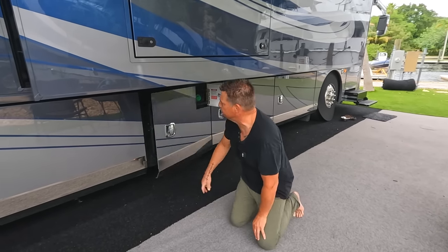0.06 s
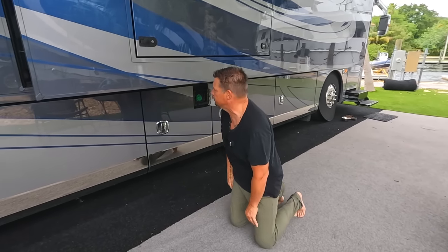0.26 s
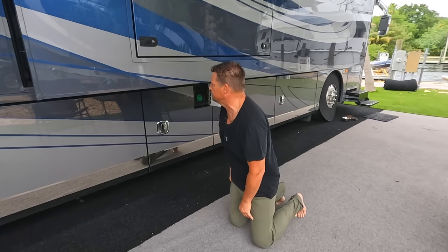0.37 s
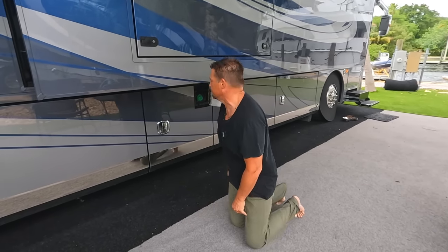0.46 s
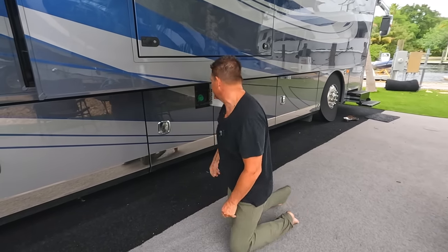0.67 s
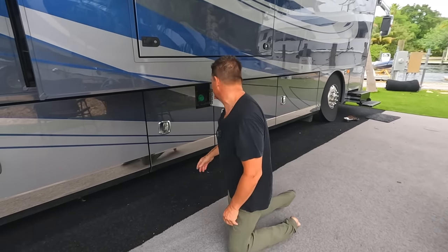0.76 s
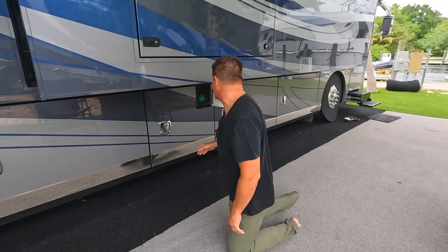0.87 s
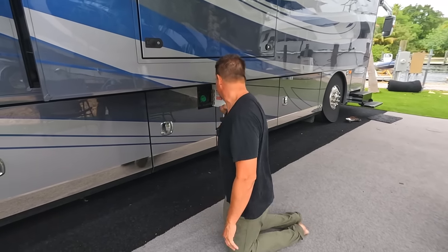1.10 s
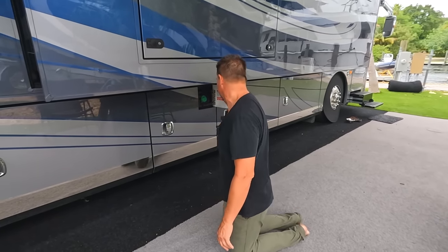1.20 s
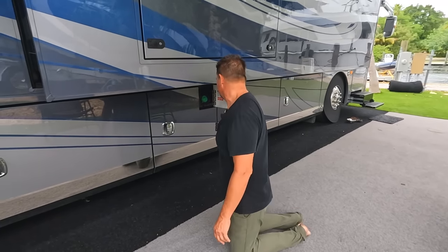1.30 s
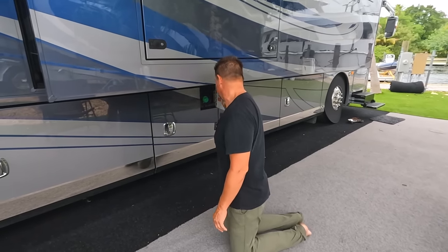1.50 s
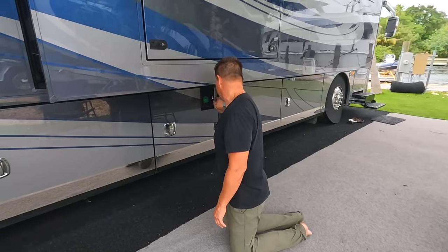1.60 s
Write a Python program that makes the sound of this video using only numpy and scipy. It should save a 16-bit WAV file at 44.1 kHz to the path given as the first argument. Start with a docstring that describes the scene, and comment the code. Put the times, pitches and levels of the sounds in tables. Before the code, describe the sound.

A metal storage door on a motorhome slams shut at about 0.25 seconds, just after a very faint hinge squeak. It booms hollowly, rattles and rings briefly as the steel latch snaps in. Deep, soft thumps follow around 0.5 seconds, with weaker ones between 1.0 and 1.4 seconds and a faint cloth scuff near 1.2. A quiet, distant outdoor rumble continues throughout.

```python
"""Outdoors, at a motorhome: the sheet-metal door of a storage bay is pushed shut.
The hinge squeaks faintly; the door meets the latch, slams home and rattles, its skin ringing.
The air shut in the bay booms and the steel latch snaps in with a small ring.
A few soft low thumps and a scuff of cloth follow, over a distant rumble."""
import sys
import numpy as np
from scipy import signal
from scipy.fft import rfft, irfft
from scipy.io import wavfile
from scipy.ndimage import uniform_filter1d

SR = 44100
rng = np.random.default_rng(int(sys.argv[2]) if len(sys.argv) > 2 else 0)


def wav_out(sig):
    """Save sig, one row per channel (or a flat mono array), as 16-bit PCM at SR to the path in sys.argv[1]."""
    wavfile.write(sys.argv[1], SR, np.round(np.clip(np.atleast_2d(sig).T, -1, 1) * 32767).astype(np.int16))


N = 72765
T = np.arange(N) / SR

# spectrum of pitch waver: (frequency [Hz], level [dB])
WAVER_SPECTRUM = [(20, 0), (200, -6)]


def door():
    """A run of contacts shakes panel and latch metal; the skin and the whole door ring on."""
    # door against frame and latch: (time [s], dull panel [dB], bright metal [dB])
    contacts = [(0.2395, -21, -29), (0.2424, -18, -27), (0.2494, -14, -28), (0.2514, -13.5, -17),
                (0.2556, -16.5, -21.5), (0.259, -37, -30), (0.2637, -21, -25), (0.2685, -35, -30),
                (0.2875, -22.5, -41), (0.2933, -25.5, -29), (0.301, -31, -38), (0.3498, -35, -40.5)]
    # contact spectra: (frequency [Hz], density [dB])
    panel_spectrum = [(150, -6), (220, -4), (330, -6.5), (450, 4), (570, -11), (680, -7.5), (900, -12),
                      (1350, -11), (1900, -20), (3000, -24.5)]
    metal_spectrum = [(1500, 8), (2100, -10.5), (2600, -1), (3000, 0), (3300, -3.5), (4800, -3), (5350, 2),
                      (6150, 1.5), (7300, 5), (8000, 8), (8550, 1.5), (9150, 6.5), (10700, -1), (11450, 4),
                      (12700, 5), (14400, -7), (15250, -1), (15800, -11)]
    # decay of the dense ringing: (frequency [Hz], t60 [s])
    panel_decay = [(150, 0.41), (500, 0.32), (1300, 0.22), (3000, 0.12)]
    metal_decay = [(2000, 0.44), (7000, 0.21), (15000, 0.22)]
    # whole door against its frame: (time [s], level [dB])
    thuds = [(.2496, -26), (.2783, -32)]
    # low modes of the whole door: (frequency [Hz], level [dB], t60 [s])
    door_modes = [(96, 8, .21), (171, 0, .3), (186, 3, .23), (230, 1.5, .18), (250, -3, .2)]
    times_s, panel_db, metal_db = np.transpose(contacts)
    panel = clatter(times_s, panel_db, panel_spectrum, panel_decay, crack_t60_s=0.053, tail_db=-9)
    metal = clatter(times_s, metal_db, metal_spectrum, metal_decay, crack_t60_s=0.036, tail_db=-15.5)
    return panel + metal + skin() + ring(*np.transpose(thuds), door_modes)


def skin():
    """The sheet metal rings briefly while pressed on the seal, longer on the rebound."""
    # flexes at slam, rebound and last snap: (time [s], level [dB], share of free t60 [ratio])
    flexes = [(0.2497, -21, 0.59), (0.2863, -19, 0.75), (0.3539, -34, 0.6)]
    # door skin: (frequency [Hz], level [dB], free t60 [s])
    skin_modes = [(343, -9, .17), (400, -6, .16), (425, -11, .16), (470, -11, .16), (657, -2.5, .18),
                  (830, -14, .25), (915, -14, .26), (1028, -12, .16), (1092, -10, .15), (1255, -12, .13),
                  (1325, -8, .13), (1490, -15, .1), (1660, -17, .19), (1770, -15, .12)]
    times_s, levels_db, t60_shares = np.transpose(flexes)
    return ring(times_s, levels_db, skin_modes, waver_hz=4, t60_shares=t60_shares)


def bay():
    """The door's soft push on the seal sets the enclosed air booming."""
    # air in the bay: (frequency [Hz], level [dB], t60 [s])
    cavity_modes = [(29.2, -6.5, 0.29), (46, -14.5, .14)]
    return boom(0.2462, cavity_modes, push_s=0.009)


def latch():
    """Steel parts bite on the striker; catch and pawl snap home and ring high and briefly."""
    # hardest steel-on-steel hits: (time [s], level [dB])
    bites = [(0.2511, -13.5), (0.2531, -21.5), (0.2566, -23), (0.2649, -17), (0.268, -31)]
    # latch snaps: (time [s], catch [dB], pawl [dB])
    snaps = [(0.2639, -37.5, -41.5), (0.2961, -37, -41.5), (0.3492, -51, -39)]
    # steel parts: (frequency [Hz], level [dB], t60 [s])
    striker_modes = [(2360, -9.5, 0.0092), (3220, -15, 0.011), (4140, -8, 0.0096), (5280, -10, 0.011),
                     (6870, -8.5, 0.006), (8100, -11.5, 0.0034)]
    catch_modes = [(2541, -4, .13), (5399, -5.5, .11), (9157, -1.5, .16), (9290, -4, .15),
                   (12950, -11, .11)]
    pawl_modes = [(3542, -11, .1), (5350, -5.5, .075), (8145, -10.5, .12), (11350, -.5, .09),
                  (11580, -5.5, .12), (15120, -14, .12), (15320, -11, .09)]
    times_s, catch_db, pawl_db = np.transpose(snaps)
    striker = ring(*np.transpose(bites), striker_modes)
    catch = ring(times_s, catch_db, catch_modes, waver_hz=70)
    pawl = ring(times_s, pawl_db, pawl_modes, waver_hz=70)
    return striker + catch + pawl


def thumps():
    """Dull bumps: a round, deep swing and a hollow knock with a soft start."""
    # bumps: (time [s], deep part [dB], knock [dB])
    bumps = [(.314, -38, -25), (.342, -24, -54), (0.446, -37, -34), (0.4764, -16.5, -36),
             (0.4977, -15.5, -38.5), (0.53, -22.5, -35), (0.561, -46, -38.5), (0.983, -28.5, -42),
             (1.099, -48, -29), (1.124, -47, -37.5), (1.155, -27.5, -36), (1.264, -42, -37.5),
             (1.408, -26.5, -44)]
    # deep part: (frequency [Hz], level [dB], t60 [s])
    deep_mode = [(47, 1, 0.073)]
    # hollow knock: (frequency [Hz], density [dB])
    knock_spectrum = [(70, -4), (145, 9.5), (190, -7), (240, -5.5), (450, -22), (800, -37)]
    knock = evened(noise(knock_spectrum), window_s=0.0147)
    out = np.zeros(N)
    for start_s, deep_db, knock_db in bumps:
        out += from_db(deep_db) * boom(start_s, deep_mode, push_s=0.0079)
        out += from_db(knock_db) * burst(start_s, rise_s=0.0021, t60_s=0.16) * knock
    return out


def hinge():
    """A brief, rough squeak as the door swings."""
    squeak = from_db(-58) * sine(3040 + 70 * noise(WAVER_SPECTRUM))
    # rough part of the squeak: (frequency [Hz], density [dB])
    rasp_spectrum = [(2600, -15), (3050, 8), (3500, -5), (5200, -7), (8400, -12), (15000, -25)]
    rasp = from_db(-57.5) * noise(rasp_spectrum)
    return (squeak + rasp) * swell(peak_s=0.147, sigma_s=0.011)


def scuff():
    """Cloth brushes softly as a kneeling man shifts his weight."""
    # cloth friction: (frequency [Hz], density [dB])
    cloth_spectrum = [(3500, 0), (4400, 1), (5500, -5), (7500, 0), (10000, -9), (14000, -11)]
    return from_db(-69) * noise(cloth_spectrum) * swell(peak_s=1.16, sigma_s=0.063)


def rumble():
    """Far outdoor rumble with a few wavering drones."""
    # rumble: (frequency [Hz], density [dB])
    air_spectrum = [(24, -11), (45, -7), (65, -8.5), (100, -13), (140, -13.5), (180, -18), (300, -22),
                    (520, -24.5), (600, -23.5), (870, -22.5), (1270, -31), (2000, -36.5), (2400, -37.5),
                    (2750, -44), (4000, -50.5), (4370, -48), (5200, -55.5), (6700, -52), (10200, -61),
                    (12700, -57.5), (14500, -62), (16000, -70)]
    # drones: (frequency [Hz], width [Hz], level [dB])
    drones = [(32.6, 9.9, -40), (155.4, 9.5, -53.5), (233.6, 12, -56.5)]
    # slow swell of both: (time [s], gain [dB])
    gain_curve = [(0, -1), (.2, 2), (.5, 2), (.9, -0.5), (1.3, -0.5), (1.65, -1)]
    flicker_db = 0.5 * noise([(2, -17), (20, 6.0)])
    air = from_db(-41 + flicker_db) * noise(air_spectrum)
    for hz, width_hz, db in drones:
        waver_hz = width_hz / 2 * noise([(2, -2.5), (15, -5.5)])
        waver_db = 2 * noise([(2, -4.5), (12, -10)])
        air += from_db(db + waver_db) * np.sqrt(2) * sine(hz + waver_hz)
    return air * from_db(np.interp(T, *np.transpose(gain_curve)))


def clatter(times_s, levels_db, spectrum, tail_decay, crack_t60_s, tail_db):
    """Countless close modes: each blow is a short crack and a tail that dies band by band."""
    def envelope(t60_s):
        power = sum((from_db(db) * burst(start_s, rise_s=0.00093, t60_s=t60_s)) ** 2
                    for start_s, db in zip(times_s, levels_db))
        return np.sqrt(power)
    bands = octaves(evened(noise(spectrum), window_s=0.0073))
    tail = sum(band * envelope(at_hz(tail_decay, hz)) for hz, band in bands)
    crack = evened(noise(spectrum), window_s=0.0068) * envelope(crack_t60_s)
    return crack + from_db(tail_db) * tail


def ring(times_s, levels_db, modes, waver_hz=0, t60_shares=None):
    """Each blow rings every mode; rattling parts ring unevenly, damped blows shorter."""
    # spectrum of level flutter: (frequency [Hz], level [dB])
    flutter_spectrum = [(30, 0), (250, -8)]
    if t60_shares is None:
        t60_shares = np.ones(len(times_s))
    out = np.zeros(N)
    for hz, mode_db, t60_s in modes:
        drift_cycles = np.cumsum(waver_hz * noise(WAVER_SPECTRUM)) / SR
        tone = np.zeros(N)
        for start_s, blow_db, share in zip(times_s, levels_db, t60_shares):
            cycles = hz * (T - start_s) + drift_cycles - np.interp(start_s, T, drift_cycles)
            tone += from_db(blow_db) * decay(start_s, t60_s * share) * np.sin(2 * np.pi * cycles)
        flutter_db = 2.5 * noise(flutter_spectrum)
        out += tone * from_db(mode_db + flutter_db)
    return out


def boom(start_s, modes, push_s):
    """A soft push sets deep modes swinging."""
    push = np.sin(np.pi * np.clip((T - start_s) / push_s, 0, 1)) ** 2
    response = sum(from_db(db) * decay(0, t60_s) * np.cos(2 * np.pi * hz * T) for hz, db, t60_s in modes)
    return -signal.fftconvolve(push / push.sum(), response)[:N]


def noise(spectrum):
    """Unit-rms coloured noise, falling steeply beyond the ends of the table."""
    hz = np.fft.rfftfreq(N, 1 / SR) + 1e-3
    low_hz, high_hz = spectrum[0][0] / 1.2, spectrum[-1][0] * 1.2
    skirts = 1 / np.sqrt((1 + (low_hz / hz) ** 8) * (1 + (hz / high_hz) ** 8))
    x = irfft(rfft(rng.standard_normal(N)) * from_db(at_hz(spectrum, hz)) * skirts, N)
    return x / np.sqrt(np.mean(x ** 2) + 1e-20)


def evened(x, window_s):
    """Noise divided by its running rms."""
    return x / np.sqrt(uniform_filter1d(x ** 2, int(window_s * SR)) + 1e-12)


def octaves(x):
    """Overlapping octave bands that sum to x: (centre [Hz], band)."""
    centres_hz = 125 * 2. ** np.arange(8)
    spectrum, log_hz = rfft(x), np.log(np.fft.rfftfreq(N, 1 / SR) + 1)
    return [(hz, irfft(spectrum * np.interp(log_hz, np.log(centres_hz), centres_hz == hz), N))
            for hz in centres_hz]


def decay(start_s, t60_s):
    """Step to 1, then exponential fall."""
    return (T >= start_s) * from_db(-60 * np.maximum(T - start_s, 0) / t60_s)


def burst(start_s, rise_s, t60_s):
    """Decay with a linear attack."""
    return np.clip((T - start_s) / rise_s, 0, 1) * decay(start_s, t60_s)


def swell(peak_s, sigma_s):
    """Gaussian envelope."""
    return np.exp(-.5 * ((T - peak_s) / sigma_s) ** 2)


def sine(hz):
    """Sine following a frequency curve."""
    return np.sin(2 * np.pi * np.cumsum(hz) / SR)


def at_hz(table, hz):
    """Table lookup on a log-frequency axis."""
    table_hz, values = np.transpose(table)
    return np.interp(np.log(hz), np.log(table_hz), values)


def from_db(db):
    """Decibels to gain."""
    return 10 ** (np.asarray(db) / 20)


def scene():
    """All sources, mono."""
    return (hinge() + door() + bay() + latch() + thumps() + scuff() + rumble())[None]


def record(dry):
    """Cut the deepest bass, round the highest peaks, cut the top."""
    highpass_hz, lowpass_hz, ceiling = 10, 15950, 0.68
    highpassed = signal.sosfilt(signal.butter(1, highpass_hz, "high", fs=SR, output="sos"), dry)
    rounded = highpassed / (1 + (highpassed / ceiling) ** 6) ** (1 / 6)
    return signal.sosfilt(signal.ellip(12, .1, 80, lowpass_hz, fs=SR, output="sos"), rounded)


dry = scene()
out = record(dry)
wav_out(out)
```